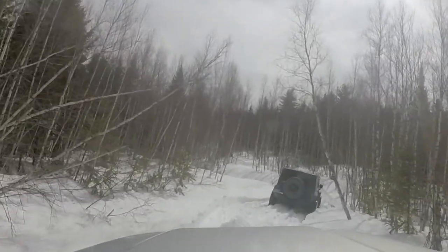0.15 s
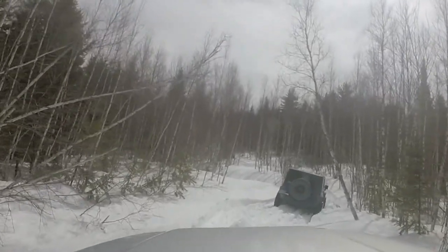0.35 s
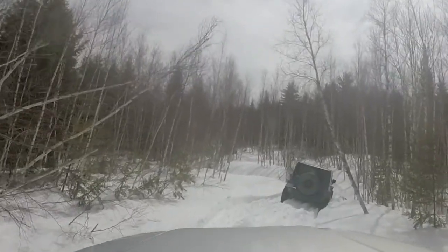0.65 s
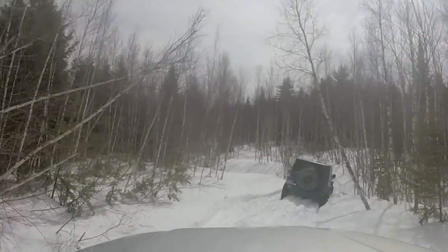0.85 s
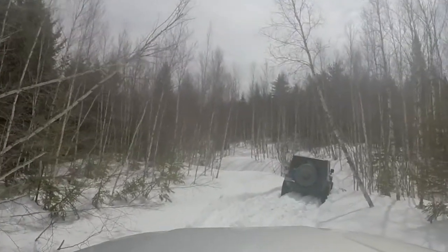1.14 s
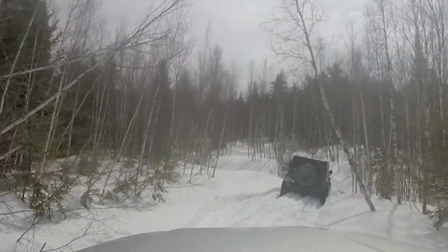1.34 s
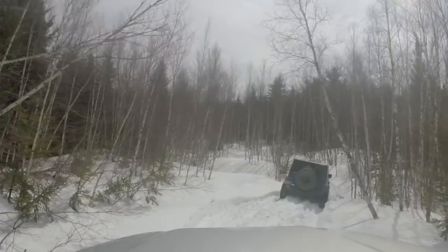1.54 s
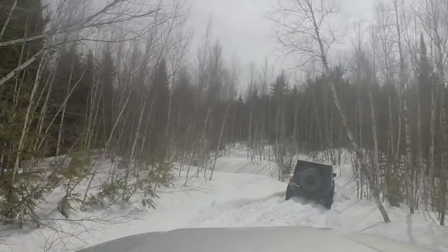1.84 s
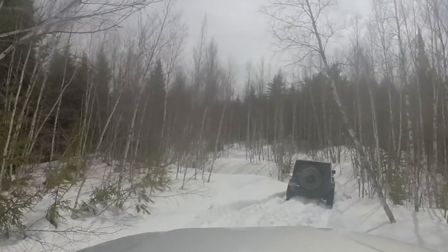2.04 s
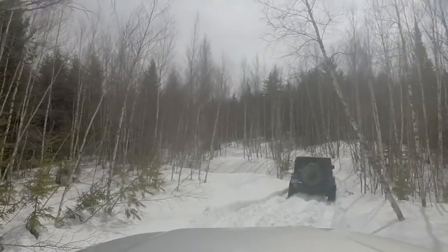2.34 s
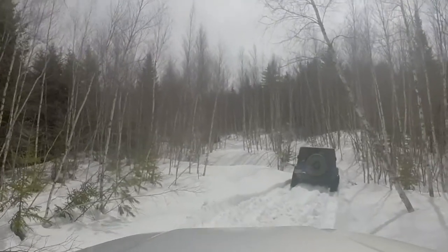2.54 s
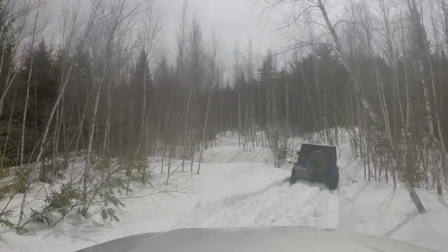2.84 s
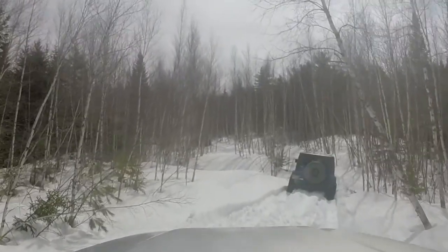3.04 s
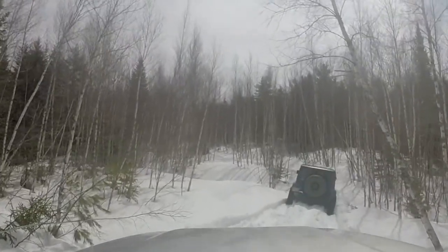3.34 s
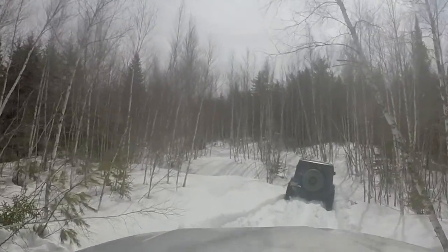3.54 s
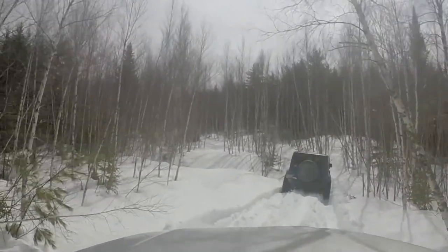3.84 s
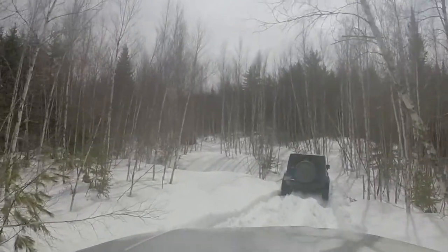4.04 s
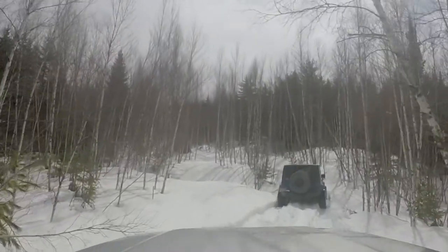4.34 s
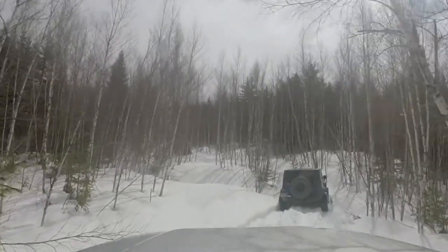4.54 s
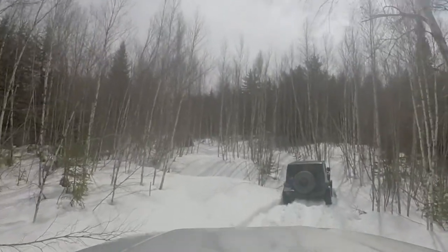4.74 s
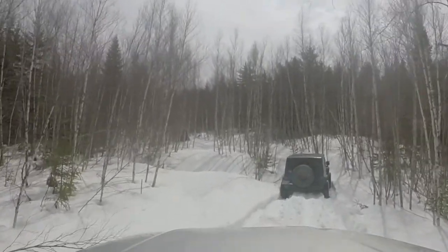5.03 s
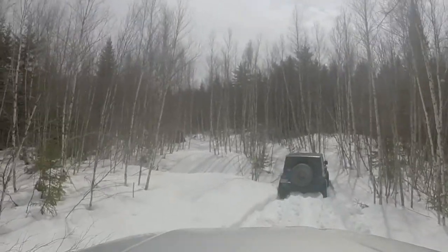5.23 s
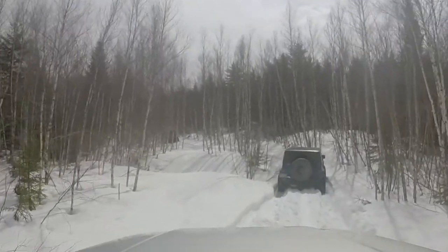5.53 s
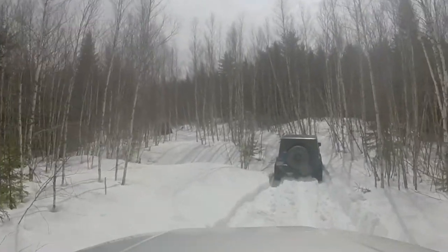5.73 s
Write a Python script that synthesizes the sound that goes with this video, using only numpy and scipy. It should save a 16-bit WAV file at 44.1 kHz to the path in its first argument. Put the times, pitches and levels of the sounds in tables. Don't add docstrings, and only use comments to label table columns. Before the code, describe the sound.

Inside a vehicle cab, a low engine drone and booming body rumble roll along as snow thuds and crunches underneath, with knocks and trim rattles.

```python
import sys
import numpy as np
from scipy import signal
from scipy.io import wavfile

SR = 44100
rng = np.random.default_rng(int(sys.argv[2]) if len(sys.argv) > 2 else 0)


def rack_gain(trim_db):
    fader = np.asarray(trim_db, float)
    return 10 ** (fader / 20)


def unload_audio(sound):
    columns = np.transpose(np.atleast_2d(sound))
    steps = np.round(np.clip(columns, -1, 1) * 32767)
    wavfile.write(sys.argv[1], SR, steps.astype(np.int16))


N = 259308

# frequency in Hz, level in dB per Hz.
AIR_SPECTRUM = [(3500, -3.5), (4200, -1.5), (5400, 0), (6200, -6), (8000, -6.5), (10500, -11.5),
                (12600, -12), (15000, -21)]
AIR_DB = -67.5

# peak time in seconds, peak level in dB, rise in seconds,
# fall in seconds, extra level of the lower hiss in dB.
BRUSHES = [
    (0.79, -60.5, 0.1, 0.09, 3.5),
    (0.93, -69, .05, 0.13, 2),
    (2.725, -69, 0.039, 0.043, 2),
    (3.65, -68, 0.12, 0.085, 3),
    (4.92, -73.5, 0.054, 0.047, -4),
    (5.05, -69, 0.03, 0.034, -8),
    (5.22, -59, 0.054, 0.072, -9),
    (5.5, -66, 0.12, 0.19, -2),
    (5.78, -71.5, 0.12, 0.12, 5),
]
# frequency in Hz, level in dB per Hz.
BRUSH_SPECTRUM = [(4000, -3), (5000, -1.5), (6500, -4.5), (8000, -4), (10000, -5), (13000, -3.5),
                  (15000, 5)]
# peak time in seconds, level in dB, pitch in Hz,
# length in seconds.
SQUEALS = [
    (0.78, -65, 9893, 0.037),
    (0.78, -73, 12700, .05),
    (3.67, -69, 14900, .04),
    (5.05, -74, 13500, 0.033),
    (5.52, -71, 13500, .07),
]
BRUSH_SPLIT_HZ = 5700
THICK_TWIG_DB = -65

# start in seconds, peak level in dB.
GLASS_CRACKS = [(0.3017, -60), (2.0577, -57), (2.524, -56), (2.5456, -53), (2.7213, -46), (3.3687, -65.5),
                (3.4101, -58), (3.671, -59), (4.574, -54.5), (5.033, -63), (5.3517, -58), (5.7778, -50.5)]
# start in seconds, peak level in dB, ring in Hz.
TRIM_TICKS = [(0.0637, -36, 2330), (0.3032, -35, 2230), (0.3662, -42, 2930), (0.6794, -43, 2980),
              (1.3551, -41, 2331), (1.6003, -43, 2730), (1.6841, -38, 2374), (2.057, -34.5, 3030),
              (2.2927, -39.5, 2870), (2.354, -39, 1900), (2.4399, -46, 2452), (2.528, -42, 3600),
              (2.6424, -39, 2445), (2.72, -36, 2704), (2.8494, -37, 2820), (3.1228, -36, 2310),
              (3.1566, -36, 2302), (3.273, -42.5, 2517), (3.6235, -35.5, 2100), (3.7903, -39, 2920),
              (3.8906, -44, 2300), (3.92, -44, 2500), (3.9374, -40, 2900), (3.9769, -39, 2472),
              (4.2308, -38, 2421), (4.4658, -40, 2408), (4.573, -38, 2909), (5.354, -34.5, 3228),
              (5.4949, -42, 2308), (5.7793, -39, 2430), (5.8086, -40, 2609)]
RATTLE_TIMES = [0.0483, 0.1226, 0.5107, 1.064, 1.839, 2.1901, 2.546, 4.0636, 4.719]
RATTLE_DB, RATTLE_HZ = -46.5, 2470
# start in seconds, peak level in dB.
SNOW_CRACKLES = [(0.1754, -48), (0.3504, -45), (0.9981, -40), (1.044, -42), (1.3865, -41), (1.5628, -43),
                 (1.6554, -43), (1.805, -44), (2.1555, -42), (2.3994, -47), (2.9014, -43), (3.2288, -49),
                 (3.3383, -45), (3.5249, -49), (3.6394, -40), (3.8347, -43), (4.1315, -56), (4.1624, -53),
                 (4.6124, -49), (5.224, -47), (5.2907, -42), (5.458, -38), (5.5321, -52), (5.6227, -39),
                 (5.6994, -41), (5.7663, -43)]
CRACKLE_HZ = 1900
TICK_BODY = 2.2

# start in seconds, peak level in dB, ring in Hz,
# 60 dB decay time in seconds.
PANEL_TAPS = [(0.237, -35, 430, 0.051), (0.3, -52, 330, 0.051), (0.354, -30, 434, 0.1),
              (0.613, -37, 360, 0.04), (1.187, -35, 567, .06), (1.187, -38, 850, 0.047),
              (1.683, -37, 467, 0.057), (2.901, -34.5, 580, .05), (3.04, -34, 438, 0.076),
              (3.463, -32, 341, 0.19), (3.486, -44, 347, 0.12), (3.623, -29.5, 563.2, 0.088),
              (3.775, -39, 516, 0.067), (3.815, -41, 944, 0.073), (3.94, -34.5, 878, 0.11),
              (4.16, -37, 490, 0.046), (4.235, -37, 884, 0.065), (4.634, -28.5, 398.3, 0.07),
              (4.844, -30.5, 359.9, 0.092), (5.291, -30.5, 569.2, 0.042), (5.405, -33, 401, .05),
              (5.445, -31, 475, 0.057), (5.693, -26.5, 445, .07)]

# start in seconds, peak level in dB, low ring in Hz, upper ring in dB,
# jolt of the snow roar in dB.
KNOCKS = [(0.921, -32, 320, -21, 0.5), (1.176, -20, 233, -29, 3.5), (1.486, -30, 258, -14, 0.5),
          (1.694, -31, 211.9, -25, 3), (1.986, -36, 216, -18, -2), (2.067, -26, 240, -22, 8.5),
          (2.869, -25.5, 229, -22.5, 3), (3.62, -45, 328, 6, 8.5), (3.937, -21.5, 307, -15.5, 5),
          (3.955, -22, 217.9, -28, 4), (4.235, -28, 211.8, -13.5, 5.5), (4.443, -46, 246, -1, 3.5),
          (5.286, -28.5, 230.5, -22, 3), (5.317, -22.5, 212, -24, 1.5), (5.679, -35, 217.7, -17, 1.5)]
UPPER_RING_HZ, PRESS_S, JOLT_S = 552, 0.026, 0.064

# peak time in seconds, level in dB, ring in Hz,
# length in seconds.
THUMPS = [(0.053, -38, 111.7, 0.03), (0.37, -28.5, 77.4, 0.028), (0.492, -27, 105.4, 0.025),
          (0.795, -49, 72, 0.04), (1.33, -40, 125.3, 0.027), (1.494, -36.5, 128, 0.068),
          (2.39, -31.5, 75, 0.032), (2.765, -30, 71.92, 0.088), (2.874, -29.5, 78.5, 0.031),
          (3.16, -30.5, 71.3, 0.054), (3.77, -30.5, 77.7, 0.056), (4.05, -35.5, 121, 0.041),
          (4.245, -27.5, 80.64, 0.037), (5.053, -26, 69.26, 0.038), (5.299, -36, 85.35, 0.03),
          (5.54, -26.5, 118.2, 0.02), (5.812, -32.5, 125.6, 0.033), (0.508, -41, 206.1, 0.043),
          (2.434, -41, 223.3, 0.021), (2.675, -46, 417.1, 0.08), (2.72, -38.5, 208, .05),
          (2.925, -45, 325, 0.066), (2.933, -39.5, 238, .03), (3.158, -36.5, 205.7, .04),
          (3.16, -45, 304.6, 0.026), (4.158, -38, 203.2, .08), (5.653, -37.5, 209.8, 0.0738),
          (2.5, -41, 95.7, 0.059), (5.505, -29, 62.7, 0.056)]

# time in seconds, depth in dB, crustiness in dB.
SNOW = [(0, 2, -1), (.2, 1, -0.5), (.38, -1, 2), (.6, 3.5, -2.5), (1.0, 1, 0), (1.4, 2, 0), (1.9, -0.5, 0),
        (2.4, 0, -0.5), (2.8, 3, -0.5), (3.1, 3, 1), (3.45, -1, -0.5), (3.7, -2.5, 1), (4.0, 1.5, -1.5),
        (4.35, 2, 0), (4.7, 1, -1), (5.05, -1.5, 0), (5.5, 3, -1), (5.88, 4.5, 0.5)]
# frequency in Hz, level in dB per Hz.
THUD_SPECTRUM = [(8, -3.5), (11, 0), (15, -8), (25, -4.5), (38, -3), (50, -3), (63, -6), (75, -9.5),
                 (88, -11), (100, -19.5), (128, -8), (143, -19.5), (160, -32)]
# frequency in Hz, level in dB per Hz.
ROAR_SPECTRUM = [(140, -9), (175, -11), (200, 0), (257, -5.5), (333, -4.5), (432, -14), (529, -13),
                 (686, -31.5), (850, -7.5)]
# frequency in Hz, level in dB per Hz.
CRUNCH_SPECTRUM = [(500, 18), (620, -4.5), (800, 4), (1090, 3.5), (1500, -5), (2000, -4), (2400, -8),
                   (3000, -9.5), (3750, -15), (4200, -28), (5500, -25), (6500, -40)]
# frequency in Hz, width in Hz, level in dB.
RINGING_PANELS = [
    (206.8, 6.2, -50),
    (349.3, 24, -51.5),
    (1970, 110, -69),
    (413, 41, -55),
    (5230, 136, -77),
]
THUD_DB, ROAR_DB, CRUNCH_DB = -28, -40.5, -50.5
THUD_FOLLOWS, CRUNCH_FOLLOWS = 0.6, 0.71

# peak time in seconds, cab boom in dB, slow sway in dB, length in seconds.
LURCHES = [(0.042, -19.5, -21.5, 0.038), (0.183, -55, -26, 0.075), (0.386, -20.5, -24, 0.084),
           (0.723, -22.5, -33, 0.26), (0.913, -33, -21.5, 0.053), (1.112, -24.5, -46, 0.098),
           (1.474, -17.5, -39, 0.15), (1.628, -31, -27.5, 0.2), (1.808, -25.5, -25.5, 0.12),
           (1.997, -30, -24.5, 0.065), (2.162, -21, -27.5, 0.11), (2.335, -19.5, -19.5, 0.083),
           (2.555, -20.5, -31, 0.16), (2.83, -38, -18, 0.14), (3.03, -15.5, -21, .1),
           (3.204, -23.5, -26, 0.078), (3.349, -21, -33.5, 0.074), (3.629, -20.5, -16.5, 0.065),
           (3.839, -19.5, -22, 0.048), (3.99, -20.5, -18.5, 0.12), (4.065, -19.5, -21, 0.015),
           (4.253, -21.5, -22, 0.094), (4.447, -37, -23.5, 0.075), (4.643, -40, -28, 0.074),
           (4.897, -24, -41, 0.046), (5.037, -22, -54.5, .07), (5.31, -25.5, -36, 0.06),
           (5.397, -21, -17.5, 0.06), (5.68, -23, -17, 0.036), (5.777, -17, -22, 0.062)]
# frequency in Hz, width in Hz.
BODY_MODES = [
    (20.5, 2.5),
    (29.8, 1.2),
    (42.0, 4.0),
]
REST_DB, FLOOR_PAN_DB = -51, -36.5
FLOOR_PAN_FOLLOWS = 0.23

# time in seconds, firing rate in Hz, load in dB, throttle bark in the pipe in dB.
ENGINE = [(0.0, 56.2, 0, -2), (0.44, 57.64, -2, -1.5), (0.83, 56.36, 1.5, -3), (1.2, 56.39, 4, 2.5),
          (1.55, 53.38, 0.5, 0), (2.06, 53.48, -1.5, 0.5), (2.29, 55.08, 1, -3), (2.67, 54.8, -1.5, 1.5),
          (2.88, 56.23, -1, -0.5), (3.16, 54.15, -3, 0), (3.47, 51.75, -4.5, 0.5), (3.72, 49.56, -7, 3),
          (4.09, 53.45, -3, 2), (4.43, 54.77, 4, -0.5), (4.72, 52.89, -11.5, 3), (5.06, 48.43, -7, -12),
          (5.57, 53.65, -8.5, 0.5), (5.88, 55.1, 4.5, -6.5)]
FIRING_DB, FIRING_PEAK_HZ, FIRING_WIDTH_HZ = -26, 54.26, 5.3
EXHAUST_DB, EXHAUST_PEAK_HZ, EXHAUST_WIDTH_HZ = -35.5, 161.9, 9.3


def in_time(rows):
    s, *columns = np.transpose(rows)
    return [np.interp(np.arange(N) / SR, s, column) for column in columns]


def rms_one(x):
    return x / np.sqrt(np.mean(x ** 2) + 1e-20)


def drift(rate):
    r = np.exp(-80 * np.pi * rate / SR)
    noise = rng.standard_normal(N // 40 + 4002)
    slow = signal.lfilter([1], [1, -2 * r, r * r], noise)[4000:]
    return np.interp(np.arange(N) / 40, np.arange(len(slow)), rms_one(slow))


def swell(s, rise, fall):
    t = np.arange(N) / SR - s
    return np.exp(-(t / np.where(t < 0, rise, fall)) ** 2)


def filtered(x, order, hz, kind="low"):
    return signal.sosfilt(signal.butter(order, hz, kind, fs=SR, output="sos"), x)


def resonate(x, hz, width_hz):
    r = np.exp(-np.pi * width_hz / SR)
    zeros = np.array([1, 0, -1]) * (1 - r * r) / 2
    return signal.lfilter(zeros, [1, -2 * r * np.cos(2 * np.pi * hz / SR), r * r], x)


def narrow_noise(x, hz, width_hz):
    return rms_one(resonate(resonate(x, hz, width_hz), hz, width_hz))


def off_peak_db(hz, centre_hz, width_hz):
    return -10 * np.log10(1 + (2 * (hz - centre_hz) / width_hz) ** 2)


def grains(per_s, spread_db):
    sizes = rack_gain(spread_db * np.minimum(rng.exponential(1, N), 5)) * rng.choice([-1, 1], N)
    return rms_one(sizes * (rng.random(N) < per_s / SR))


def coloured(sources, spectrum, patchy_db):
    hz, level_db = np.transpose(spectrum)
    top_hz = min(hz[-1], .45 * SR)
    edges = np.geomspace(hz[0], top_hz, int(3 * np.log2(hz[-1] / hz[0])) + 2)
    out, together = 0, drift(22.0)
    for k, (low, high) in enumerate(zip(edges, edges[1:])):
        band = filtered(sources[k % 2], 2, [low, high], "band")
        centre_db = np.interp(np.log(low * high) / 2, np.log(hz), level_db)
        flicker = 0.77 * together + 0.61 * drift(12.4)
        out = out + band * rack_gain(centre_db + patchy_db * flicker)
    return rms_one(filtered(out, 4, top_hz))


def add(track, s, sound):
    i = round(s * SR)
    track[i:i + len(sound)] += sound[:N - i]


def blower():
    return rack_gain(AIR_DB) * coloured(rng.standard_normal((2, N)), AIR_SPECTRUM, patchy_db=.6)


def twigs():
    fine = [grains(6000, 2.2), grains(5000, 2.4)]
    hiss = coloured(fine, BRUSH_SPECTRUM, patchy_db=1.8)
    low = filtered(hiss, 4, BRUSH_SPLIT_HZ)
    high = filtered(hiss, 4, BRUSH_SPLIT_HZ, "high")
    gain = sum(rack_gain(db) * swell(s, rise, fall) for s, db, rise, fall, _ in BRUSHES)
    low_gain = sum(rack_gain(db + low_db) * swell(s, rise, fall) for s, db, rise, fall, low_db in BRUSHES)
    thick = rack_gain(THICK_TWIG_DB) * swell(0.83, .06, .05) * narrow_noise(fine[0], 4850, 1500)
    squeals = sum(rack_gain(db) * swell(s, length, length) * narrow_noise(fine[1], hz, 900)
                  for s, db, hz, length in SQUEALS)
    return thick + low_gain * low + gain * high + squeals


def ticks():
    out, t = np.zeros(N), np.arange(round(.06 * SR)) / SR
    rattles = [(s, RATTLE_DB, RATTLE_HZ) for s in RATTLE_TIMES]
    crackles = [(s, db, CRACKLE_HZ) for s, db in SNOW_CRACKLES]
    onset = 1 - np.exp(-t / 0.0003)
    for s, peak_db, hz in TRIM_TICKS + rattles + crackles:
        hiss = rng.standard_normal(len(t))
        ring = resonate(hiss, hz, 1600) + TICK_BODY * resonate(hiss, hz / 2, 1400)
        ring = rms_one(filtered(ring, 3, [700, 4900], "band"))
        add(out, s, ring * rack_gain(peak_db - 9.5 - 60 * t / 0.05) * onset)
    for s, peak_db in GLASS_CRACKS:
        bright = rms_one(filtered(rng.standard_normal(len(t)), 4, 8500, "high"))
        add(out, s, bright * rack_gain(peak_db - 5 - 60 * t / .03))
    return out


def taps():
    out, t = np.zeros(N), np.arange(round(.12 * SR)) / SR
    onset = 1 - np.exp(-t / 0.0013)
    for s, peak_db, hz, t60 in PANEL_TAPS:
        add(out, s, rack_gain(peak_db + 0.5 - 60 * t / t60) * onset * np.sin(2 * np.pi * hz * t))
    return out


def knocks():
    out, t = np.zeros(N), np.arange(round(.15 * SR)) / SR
    press = (1 - np.exp(-t / 0.002)) * np.exp(-(t / PRESS_S) ** 2)
    upper = np.sin(2 * np.pi * UPPER_RING_HZ * t) + 0.26 * np.sin(2 * np.pi * 620 * t)
    for s, peak_db, low_hz, high_db, _ in KNOCKS:
        hiss = rng.standard_normal(len(t))
        low = np.sin(2 * np.pi * low_hz * t * (1 - 1.5 * t))
        clatter = 0.51 * narrow_noise(hiss, 1600, 900) * np.exp(-t / 0.024)
        rough = 0.051 * rms_one(filtered(hiss, 4, [200, 1100], "band"))
        blow = low + rack_gain(high_db) * (upper + clatter) + rough
        add(out, s, rack_gain(peak_db - 2) * press * blow)
    return out


def thumps():
    t = np.arange(N) / SR
    return sum(np.sqrt(2) * rack_gain(db) * swell(s, length, length) * np.sin(2 * np.pi * hz * t)
               for s, db, hz, length in THUMPS)


def snow(turn):
    depth_db, crust_db = in_time(SNOW)
    jolt_db = sum(db * swell(s + 0.0067, JOLT_S / 2, JOLT_S) for s, *_, db in KNOCKS)
    thud_db = THUD_DB + THUD_FOLLOWS * depth_db + 0.23 * drift(4.5)
    roar_db = ROAR_DB + depth_db + jolt_db
    crunch_db = CRUNCH_DB + CRUNCH_FOLLOWS * depth_db + crust_db + 0.2 * jolt_db
    throb_db = 0.3 * np.sin(turn)
    thud = rack_gain(thud_db) * coloured(rng.standard_normal((2, N)), THUD_SPECTRUM, patchy_db=2.0)
    roar = rack_gain(roar_db) * coloured(rng.standard_normal((2, N)), ROAR_SPECTRUM, patchy_db=1.5)
    gritty = rng.standard_normal((2, N)) + 0.36 * grains(120, 1.7)
    crunch = rack_gain(crunch_db + throb_db) * coloured(gritty, CRUNCH_SPECTRUM, patchy_db=1.3)
    shake = rng.standard_normal(N) * rack_gain(2.5 * drift(3.9))
    panels = sum(rack_gain(db) * rms_one(resonate(shake, hz, width)) for hz, width, db in RINGING_PANELS)
    return thud + roar + crunch + filtered(panels, 2, 2600)


def body():
    boom = rack_gain(REST_DB) + sum(rack_gain(db) * swell(s, length, length) for s, db, _, length in LURCHES)
    sway = rack_gain(REST_DB) + sum(rack_gain(db) * swell(s, length, length) for s, _, db, length in LURCHES)
    pan = rack_gain(FLOOR_PAN_DB + 5.1 * drift(6.4)) * rms_one(boom + sway) ** FLOOR_PAN_FOLLOWS
    out = 0
    for (hz, width_hz), level in zip(BODY_MODES, (sway, boom, pan)):
        phase = 2 * np.pi * np.cumsum(hz + width_hz / 2 * drift(3.37)) / SR
        out = out + np.sqrt(2) * level * np.cos(phase)
    return out


def engine():
    firing_hz, load_db, bark_db = in_time(ENGINE)
    cab_db = off_peak_db(firing_hz, FIRING_PEAK_HZ, FIRING_WIDTH_HZ)
    pipe_db = off_peak_db(3 * firing_hz, EXHAUST_PEAK_HZ, EXHAUST_WIDTH_HZ)
    first_db = FIRING_DB + load_db + cab_db
    second_db = first_db - 22.5 + 2 * drift(2.8)
    third_db = EXHAUST_DB + bark_db + pipe_db
    fourth_db = third_db - 16.5
    turn = 2 * np.pi * np.cumsum(firing_hz * (1 + .0015 * drift(5))) / SR
    hum = 0
    for k, db in enumerate((first_db, second_db, third_db, fourth_db), start=1):
        hum = hum + np.sqrt(2) * rack_gain(db + .7 * drift(6)) * np.sin(k * turn)
    return hum, turn


def scene():
    hum, turn = engine()
    surroundings = blower() + twigs()
    impacts = ticks() + taps() + knocks() + thumps()
    return (surroundings + impacts + snow(turn) + body() + hum)[None]


def band_limit(x):
    return signal.sosfilt(signal.butter(12, 15220, fs=SR, output="sos"), x)


def record(dry):
    cut = filtered(dry, 2, 8, "high")
    mix = .7 * np.tanh(cut / .7)
    return band_limit(mix)


dry = scene()
out = record(dry)
unload_audio(out)
```